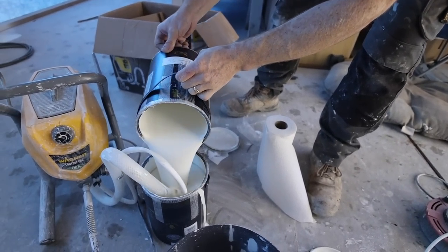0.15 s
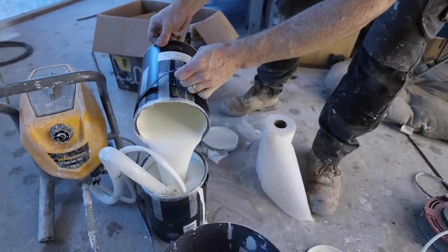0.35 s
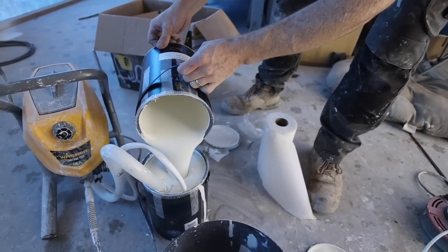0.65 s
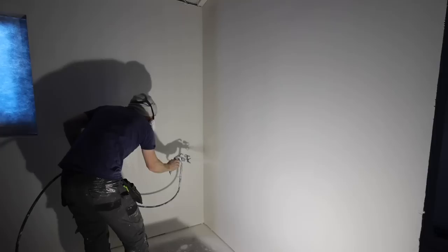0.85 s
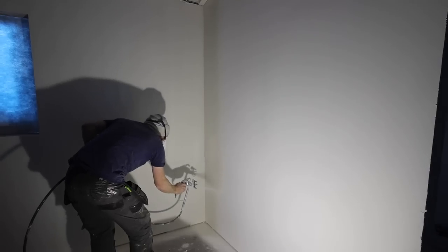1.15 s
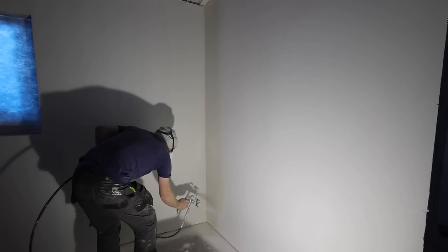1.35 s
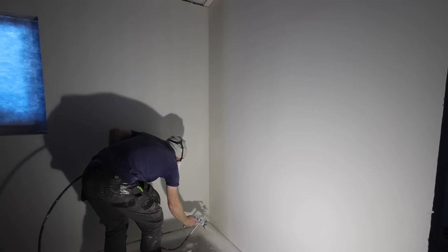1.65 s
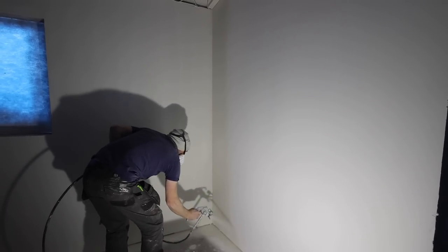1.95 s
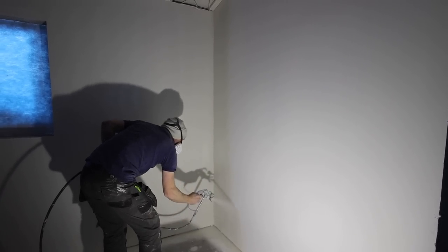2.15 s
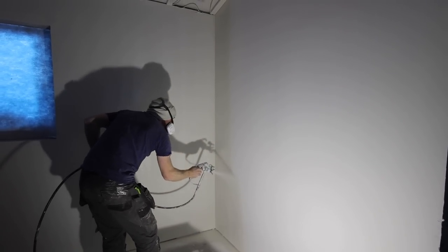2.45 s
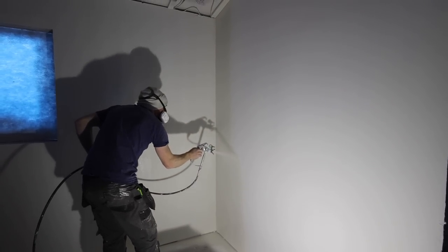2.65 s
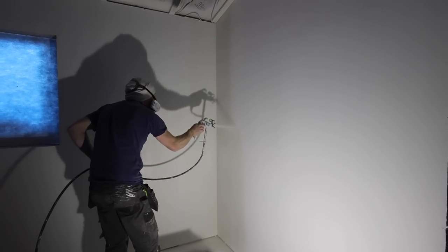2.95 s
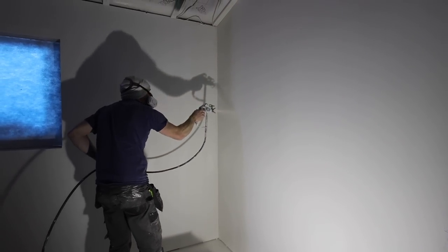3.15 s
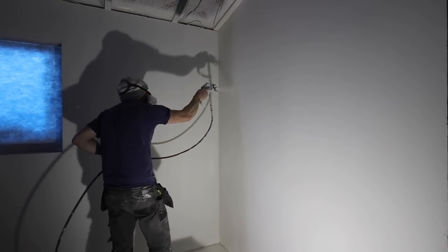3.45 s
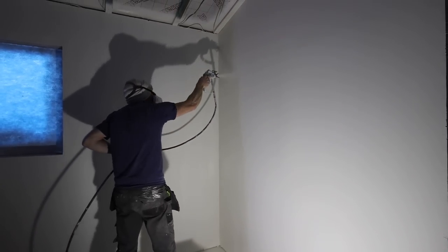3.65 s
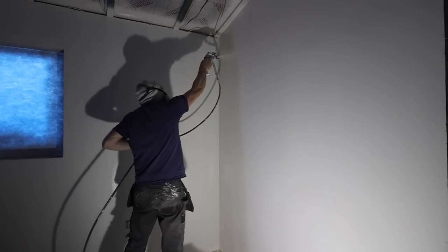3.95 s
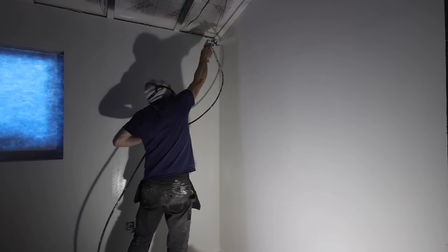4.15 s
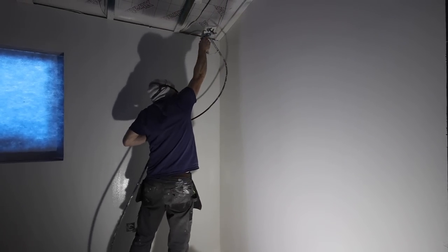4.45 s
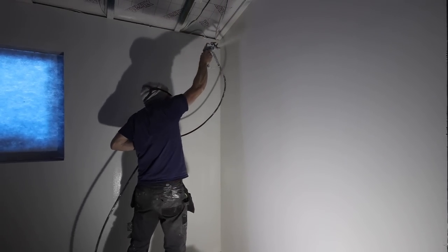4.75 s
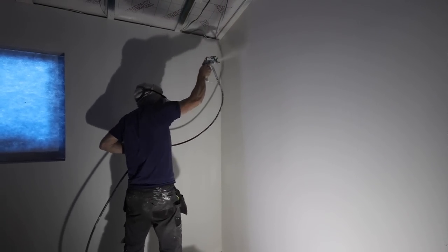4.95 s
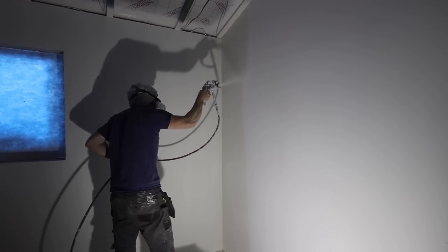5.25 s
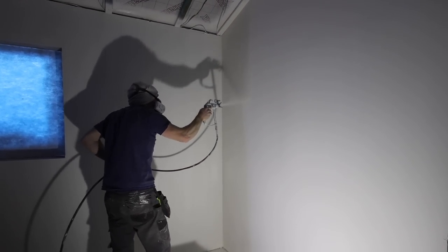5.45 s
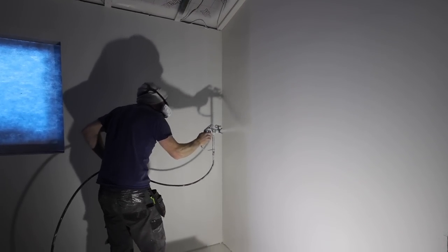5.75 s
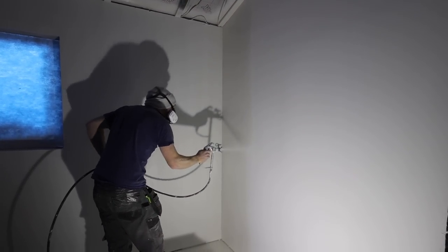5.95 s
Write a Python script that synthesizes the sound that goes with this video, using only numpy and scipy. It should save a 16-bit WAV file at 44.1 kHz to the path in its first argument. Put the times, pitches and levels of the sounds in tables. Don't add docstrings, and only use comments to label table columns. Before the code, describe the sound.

Faint hum and pouring paint in a quiet room, then a hard cut to a sprayer's dense hiss and its knocking, whining pump cycling.

```python
import sys
import numpy as np
from scipy import signal
from scipy.fft import rfft, irfft
from scipy.io import wavfile
from scipy.ndimage import uniform_filter1d

SR = 44100
rng = np.random.default_rng(int(sys.argv[2]) if len(sys.argv) > 2 else 0)


def materialize(psi):
    bounded = np.clip(np.atleast_2d(psi).T, -1, 1)
    quanta = np.round(bounded * 32767).astype(np.int16)
    wavfile.write(sys.argv[1], SR, quanta)


def gain_from_db(level_db):
    decades = np.asarray(level_db, float) / 20
    return 10 ** decades


N = 269010

CUT_S = .8862
FULL_SPEED = 18.43
STRAIN_AT = 0.085


def spray():
    # frequency in Hz, level in dB per Hz.
    fan = [(35, -59), (60, -26), (294, -20), (417, -16.5), (666, -20.5), (1780, -13.5), (2190, -16),
           (2970, -10.5), (3930, -8.5), (5200, -5), (8110, -0.5), (9100, -3), (9800, -8.5), (13700, -10.5),
           (14500, -14), (16000, -17)]
    # time in seconds, jet level in dB, aim toward the listener in dB.
    gun = [(.89, -27.5, .5), (1.0, -26.5, -1.5), (1.32, -30.5, 1.3), (1.4, -30, -1), (1.68, -29.5, -0.5),
           (1.74, -32.5, 3), (1.78, -30.5, -.5), (1.89, -28.5, 0), (2.44, -27.5, -0.5), (2.88, -28.5, 1),
           (3.49, -30.5, -2), (4.12, -30, 0), (4.73, -28.5, .5), (5.0, -28.5, -1), (5.68, -30.5, -2),
           (6.1, -28.5, -0.5)]
    fizz_follows, splash_follows = 1.04, 0.08
    hose_sag_db, hose_hi_hz = -11, 1100
    hz, frames = spectrum_grid(512)
    jet_db, aim_db = curves(gun, frames)
    fizz_db = (fizz_follows - 1) * jet_db + aim_db
    splash_db = (splash_follows - 1) * jet_db
    top = np.clip((hz - 9500) / 1500, 0, 1)
    low = np.clip((6500 - hz) / 1200, 0, 1)
    field = read_spectrum(fan, hz) + top * (fizz_db - fizz_db.mean()) + low * (splash_db - splash_db.mean())
    speed, driven = shaft(frames)
    starved = (1 - driven) * (1 - speed / FULL_SPEED) ** 5
    field = field + hose_sag_db * starved * np.clip((hose_hi_hz + 2400 - hz) / 2400, 0, 1)
    flicker_db = .5 * rng.standard_normal(len(frames))
    hiss = noise(field + flicker_db, 0.9, 10, 12)
    jet_level = gain_from_db(curves(gun, np.arange(N) / SR)[0])
    return hiss / band_rms(hiss, 5870, 10400) * jet_level


def pump():
    # multiple of
    # the shaft speed, level in dB.
    shaft_orders = [(1, -38), (2, -35), (3, -19), (4, -34), (5, -23), (6, -23), (7, -33), (8, -11), (9, -6.5),
                    (10, -10), (11, -28), (12, -2), (13, -10), (14, -10), (15, -11.5), (16, -5.5), (17, -7),
                    (18, -10.5), (19, -14), (20, -26), (21, -25), (22, 1), (23, -17), (24, -2), (25, -13),
                    (26, -24), (27, -9), (28, -5.5), (29, -9), (30, -10),
                    (48, -4.5), (54, -20), (56, -9), (57, -8), (60, -4), (61, -11), (67, -13), (68, -2.5),
                 (99, -8.5), (101, -17), (116, -11), (119, -6), (120, -6), (122, -10.5)]
    pump_db, hunt = -36, .002
    thump_lo_hz = 340
    strain_db, strain_hi_hz = 9, 116
    freewheel_db = 10
    loose_db = 12
    t, hz = np.arange(N) / SR, np.fft.rfftfreq(N, 1 / SR)
    turns = np.cumsum(shaft(t)[0] * (1 + hunt * lumps(2.5))) / SR
    turns = turns + turns[-1] % 1 * np.clip(1 - 2 * t, 0, 1)

    order = np.arange(2049)
    force_db = np.where(order < 200, -9.0 + 2.8 * rng.standard_normal(2049), -200)
    for k, db in shaft_orders:
        force_db[round(k)] = db - housing_db(k * FULL_SPEED)
    pattern = irfft(gain_from_db(force_db) * np.exp(2j * np.pi * rng.random(2049)))
    knocks = evened(np.interp(turns % 1 * 4096, np.arange(4097), np.append(pattern, pattern[0])))

    rattle = rng.standard_normal(N) * (1 + 0.15 * np.cos(4 * np.pi * turns))
    rattle = evened(irfft(rfft(rattle) * np.clip((hz - 60) / 400, .05, 1) * (hz < 4500), N))

    level_db, thump_db, whine_db, upper_db = effort(t)
    speed, driven = shaft(t)
    lost = np.clip(1 - speed / FULL_SPEED, 0, 1)
    loose = gain_from_db(loose_db * np.minimum(lost, .3))
    shaking = knocks / loose + gain_from_db(-4.0) * np.sqrt(loose) * rattle
    body = rfft(shaking) * gain_from_db(housing_db(hz)) * (hz > 35)

    over_low, over_mid = np.clip((hz - 600) / 300, 0, 1), np.clip((hz - 1400) / 300, 0, 1)
    low = irfft(body * (1 - over_low), N)
    mid = irfft(body * (over_low - over_mid), N)
    top = irfft(body * over_mid, N)

    panels = irfft(rfft(low) * np.clip((hz - thump_lo_hz) / 60, 0, 1), N)
    frame = irfft(rfft(low) * np.clip((strain_hi_hz + 30 - hz) / 30, 0, 1), N)
    boom_db = driven * strain_db * bump(lost, STRAIN_AT, 0.056, .12) + (1 - driven) * freewheel_db * lost
    low = low + (gain_from_db(thump_db) - 1) * panels + (gain_from_db(boom_db) - 1) * frame
    scale = band_rms(low[2 * SR:5 * SR // 2], 130, 670)
    return gain_from_db(pump_db) * (gain_from_db(level_db) * low + gain_from_db(whine_db) * mid + gain_from_db(upper_db) * top) / scale


def housing_db(hz):
    # frequency in Hz, level in dB per Hz.
    colour = [(24, -56), (40, -24), (80, -16), (223, -4), (366, -7), (446, -1), (482, -3.5), (662, -7),
              (1270, -5), (1640, -10.5), (1890, -7.5), (2800, -11), (4500, -14.5), (5850, -40),
              (9900, -120)]
    # pitch in Hz, width in Hz, boost in dB.
    resonances = [(55, 8.5, 7.2), (152, 41, 8.4), (237.5, 17, 12), (294, 22, 4.7), (404, 23, 6.5),
                  (442, 12.6, 7.6), (524, 24, 3.7), (1010, 170, 2.7), (1262, 22, 3.6), (1950, 77, 2.1),
                  (2150, 150, 1.2)]
    return read_spectrum(colour, hz) + sum(db / (1 + (2 * (hz - f) / w) ** 2) for f, w, db in resonances)


def shaft(t):
    # motor off in seconds, motor on in seconds.
    switch = [
        (.7, 1.282),
        (2.79, 3.368),
        (4.79, 5.358),
    ]
    pull_speed, creep_speed = 19.3, 2.6
    run_up_s, coast_per_s = .19, 29
    catch_s, let_go_s = 0.02, .03
    overshoot, settle_s = .22, .17
    speed, driven = FULL_SPEED + 0 * t, 1 + 0 * t
    for off, on in switch:
        since = np.maximum(t - on, 0)
        coast = np.clip(FULL_SPEED - coast_per_s * (t - off), creep_speed, speed)
        run_up = pull_speed - (pull_speed - creep_speed) * np.exp(-since / run_up_s)
        held = FULL_SPEED + overshoot * np.exp(-np.maximum(since - .6, 0) / settle_s)
        speed = np.where(t < on, coast, np.minimum(run_up, held))
        driven = driven - np.clip((t - off) / let_go_s, 0, 1) + np.clip((t - on) / catch_s, 0, 1)
    return speed, driven


def effort(t):
    # time in seconds, dB over the
    heavy_strokes = [
        (.965, 7.5),
        (1.315, -3),
        (3.09, 12),
        (3.425, 3.5),
        (3.62, 3.5),
        (5.11, 11),
        (5.44, 0.5),
        (5.525, 3.5),
    ]
    thump_rise_s, thump_fall_s = 0.024, 0.022
    lumpy_db, lumps_per_s = 6, 16.4
    coast_curve, patchy_db, strain_whine_db = 1.42, 2.05, 1.5
    speed, driven = shaft(t)
    lost = np.clip(1 - speed / FULL_SPEED, 0, 1)

    def sag(driven_db, coasting_db):
        return driven * lost * driven_db + (1 - driven) * lost ** coast_curve * coasting_db

    body, whine, upper = sag(-11, -35), sag(-13.5, -25.5), sag(-11.5, -20.5)
    upper = upper + driven * strain_whine_db * bump(lost, STRAIN_AT, 0.057, 0.14)
    thumps = sum(db * bump(t, s, thump_rise_s, thump_fall_s) for s, db in heavy_strokes)
    body = body + lumpy_db * np.minimum(lost, .3) * lumps(lumps_per_s)
    return body, thumps, whine + .5 * patchy_db * lumps(4.3), upper + .5 * patchy_db * lumps(3.6)


def squeaks():
    # start in seconds, peak in dB, first pitch in Hz, fall in Hz, length in seconds.
    chirps = [
        (2.9262, -23.5, 3740, 258.7, 0.04),
        (4.9417, -22.5, 3753, 260.3, 0.043),
        (5.39, -32, 3680, 260.4, 0.049),
    ]
    out = np.zeros(N)
    for s, db, hz, fall_hz, length in chirps:
        u = np.arange(round(length * SR)) / SR
        pitch = hz - fall_hz * (u / length) ** 1.22 + 40 * lumps(150)[:len(u)]
        chirp = np.sin(2 * np.pi * np.cumsum(pitch) / SR)
        ring = np.sin(2 * np.pi * (.95 * hz - 4000 * u) * u) * np.exp(-u / 0.021)
        sound = gain_from_db(db - 6.5) * (chirp + 1.2 * ring) * signal.windows.tukey(len(u), .35)
        add(out, s - .008, sound)
        lower = np.sin(2 * np.pi * (.9 * hz - 3000 * u) * u)
        add(out, s + 0.03, gain_from_db(db - 15.0) * lower * np.hanning(len(u)))
        add(out, s + 0.041, .55 * sound[:len(u) // 2] * np.hanning(len(u) // 2))
    return out


def room(x, t60=0.56):
    taps = np.zeros(SR)
    at = np.arange(300, SR - 20, 20) + rng.integers(0, 20, (SR - 301) // 20)
    taps[at] = rng.choice([-1., 1.], len(at)) * gain_from_db(-60 * at / SR / t60)
    return signal.fftconvolve(x, taps / np.linalg.norm(taps))[:N]


def quiet_room():
    # frequency in Hz, level in dB per Hz.
    floor = [(24, -38), (40, -5), (124, -14), (175, -7), (237, -15), (320, -9), (401, -13), (1180, -19),
             (2200, -26.5), (12100, -31.5), (16000, -35)]
    # frequency in Hz, level in dB.
    hum_lines = [
        (172.3, -64),
        (215.3, -86),
        (323.0, -79),
        (430.7, -86),
    ]
    # time in seconds, peak in dB, ring in Hz.
    ticks = [
        (0.5254, -60, 8180),
        (0.5472, -48, 12900),
        (0.6434, -60, 8610),
    ]
    # frequency in Hz, level in dB.
    side_share = [(60, -18), (200, -26), (500, -20), (900, -24), (1300, -45), (16000, -50)]
    floor_db, rumble_db = -66.5, -70
    nudge_s, nudge_db, nudge_wide_s = 0.89, 7, .14
    pour_s, pour_wide_s = 0.63, .09
    pour_fizz_db, pour_rumble_db = 2, -7
    t, (hz, frames) = np.arange(N) / SR, spectrum_grid(1024)
    gush = bump(frames, pour_s, pour_wide_s, pour_wide_s)
    field = read_spectrum(floor, hz) + pour_fizz_db * gush * np.clip(hz / 3000, 0, 1)
    mid, other = noise(field, 1.4, 12, 8), noise(field, 1.5, 12, 8)
    apart = gain_from_db(read_spectrum(side_share, np.fft.rfftfreq(N, 1 / SR)))
    scale = gain_from_db(floor_db) / band_rms(mid[:SR // 2], 250, 16000)
    side = scale * irfft(rfft(other) * apart, N)
    hum = sum(gain_from_db(db + 3.5 + .6 * wander(6)) * np.sin(2 * np.pi * (f * t + rng.random()))
              for f, db in hum_lines)
    rumble = evened(noise(-40 * np.log2(hz / 25 + .2) ** 2 + 0 * frames, 0, 1, 1)) * gain_from_db(rumble_db)
    swell_db = pour_rumble_db * bump(t, pour_s, .06, .05) + nudge_db * bump(t, nudge_s, nudge_wide_s, 1)
    mid = scale * mid + hum + rumble * gain_from_db(swell_db)
    for s, db, ring_hz in ticks:
        u = t[:200]
        ring = np.sin(2 * np.pi * ring_hz * u) + .7 * np.sin(2 * np.pi * 8200 * u)
        add(mid, s, gain_from_db(db - 60 * u / .004) * ring)
    return np.array([mid + side, mid - side])


def stray_bands(dry):
    count, lo_hz, hi_hz, wide_hz, level_db = 28, 4600, 14800, 1300, -4
    side, hz = np.zeros(N), np.fft.rfftfreq(2048, 1 / SR)
    first = round(CUT_S * SR) // 1024
    for when, where, wide in rng.random((count, 3)):
        at = 59 + 1024 * (first + int(when * (N // 1024 - first - 2)))
        centre = lo_hz + where * (hi_hz - lo_hz)
        half = wide_hz * (.35 + .4 * wide)
        burst = irfft(rfft(rng.standard_normal(2048)) * (abs(hz - centre) < half))
        level = gain_from_db(level_db) * band_rms(dry[0, at:at + 2048], centre - half, centre + half)
        add(side, at / SR, level * evened(burst) * signal.windows.kaiser_bessel_derived(2048, 4 * np.pi))
    return np.array([side, -side])


def evened(x):
    return x / np.sqrt(np.mean(x ** 2) + 1e-20)


def read_spectrum(points, hz):
    f, value = np.transpose(points)
    return np.interp(np.log(hz + 1), np.log(f + 1), value)


def curves(rows, t):
    s, *columns = np.transpose(rows)
    return [np.interp(t, s, c) for c in columns]


def spectrum_grid(size):
    return np.fft.rfftfreq(size, 1 / SR)[:, None], np.arange(4 * N // size + 5) * size / 4 / SR


def noise(db, patchy_db, wide, long):
    a, b, patches = rng.standard_normal(db.shape[::-1] + (3,)).T
    patches = evened(uniform_filter1d(uniform_filter1d(patches, wide, 0), long, 1))
    size = 2 * len(db) - 3
    spectrum = (a + 1j * b) * gain_from_db(db + patchy_db * patches)
    return signal.istft(spectrum, nperseg=size, noverlap=size * 3 // 4)[1][:N]


def wander(per_s):
    return evened(signal.lfilter([1], [1, -np.exp(-2 * np.pi * per_s / SR)], rng.standard_normal(N)))


def lumps(per_s):
    slow = signal.sosfilt(signal.butter(2, per_s, fs=SR, output="sos"), rng.standard_normal(N))
    return evened(slow - slow.mean())


def bump(t, s, rise, fall):
    return np.exp(-((t - s) / np.where(t < s, rise, fall)) ** 2)


def band_rms(x, lo_hz, hi_hz):
    hz = np.fft.rfftfreq(len(x), 1 / SR)
    return np.sqrt(2 * np.sum(abs(rfft(x)[(hz > lo_hz) & (hz < hi_hz)]) ** 2)) / len(x)


def add(mix, s, sound):
    part = mix[round(s * SR):][:len(sound)]
    part += sound[:len(part)]


def scene():
    after = np.clip((np.arange(N) / SR - CUT_S) / 0.00044, 0, 1)
    machine = pump() + squeaks()
    bare_room = spray() + gain_from_db(-1.5) * machine + gain_from_db(-13.5) * room(machine)
    return (1 - after) * quiet_room() + after * bare_room


def top_cut(x):
    return signal.sosfilt(signal.butter(12, 15740, fs=SR, output="sos"), x)


def record(dry):
    edge = signal.firwin(511, 15950, window=("kaiser", 9), fs=SR)
    mix = signal.oaconvolve(dry + stray_bands(dry), edge[None], "same")
    return top_cut(mix)


dry = scene()
out = record(dry)
materialize(out)
```